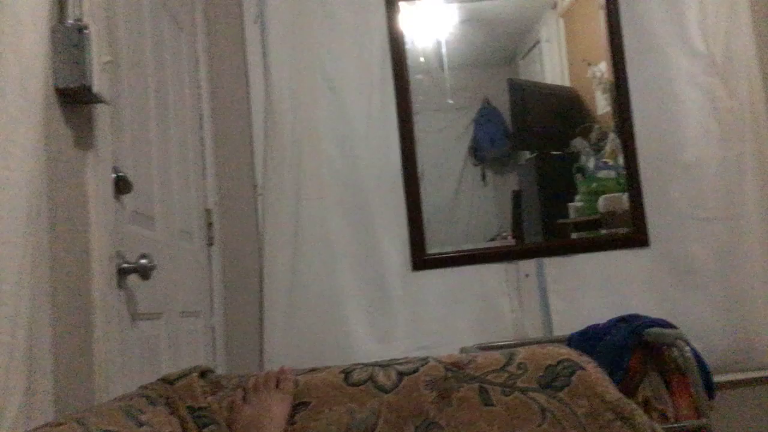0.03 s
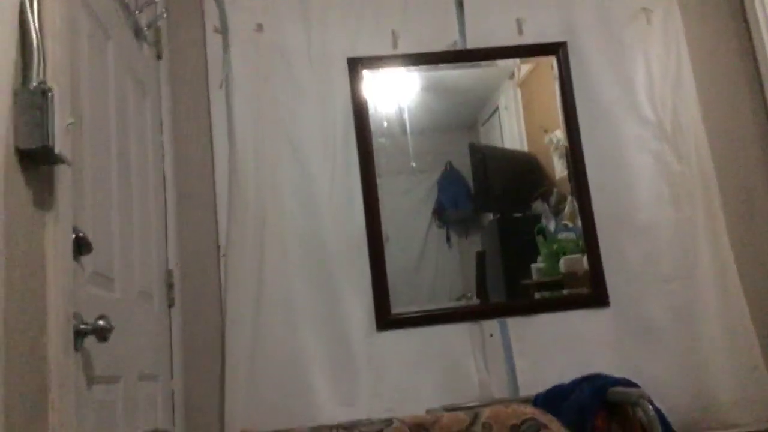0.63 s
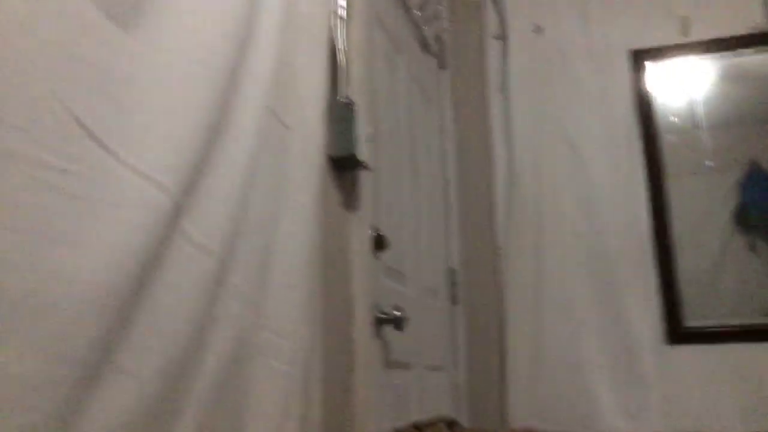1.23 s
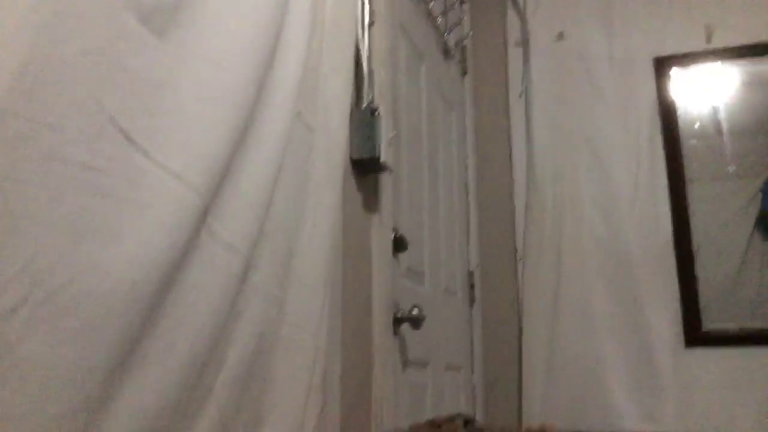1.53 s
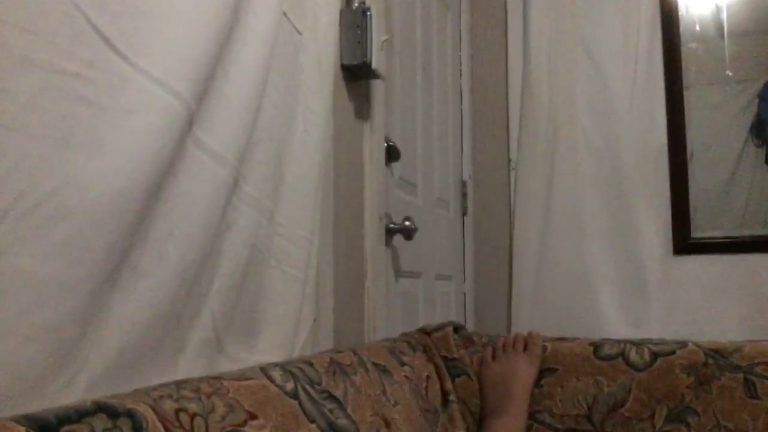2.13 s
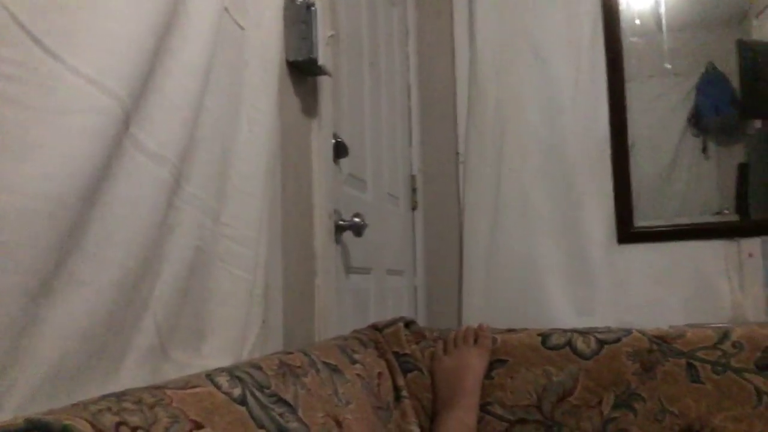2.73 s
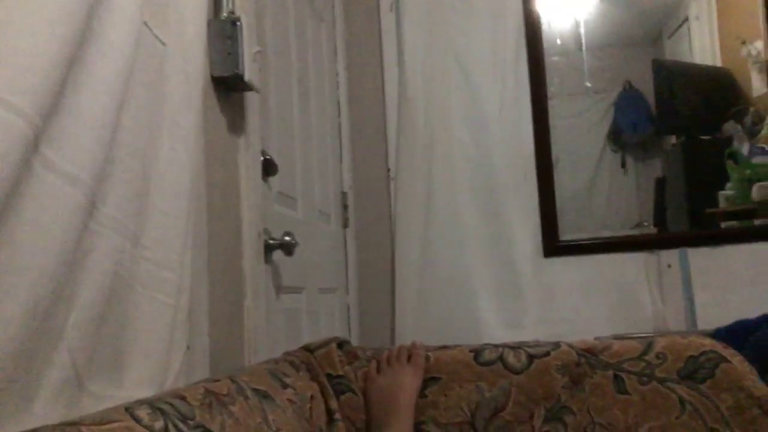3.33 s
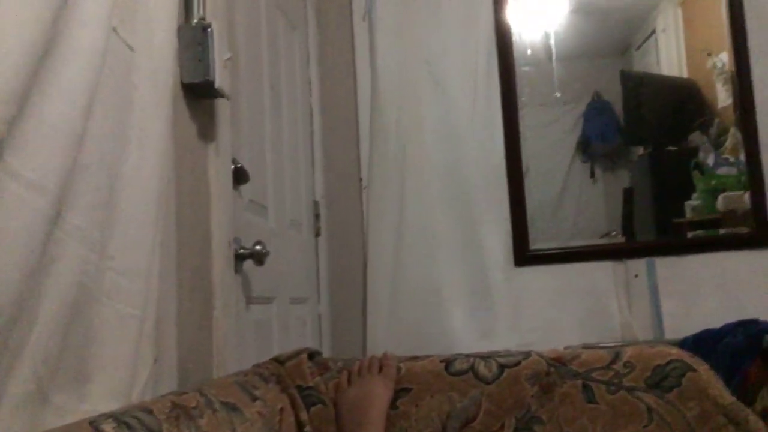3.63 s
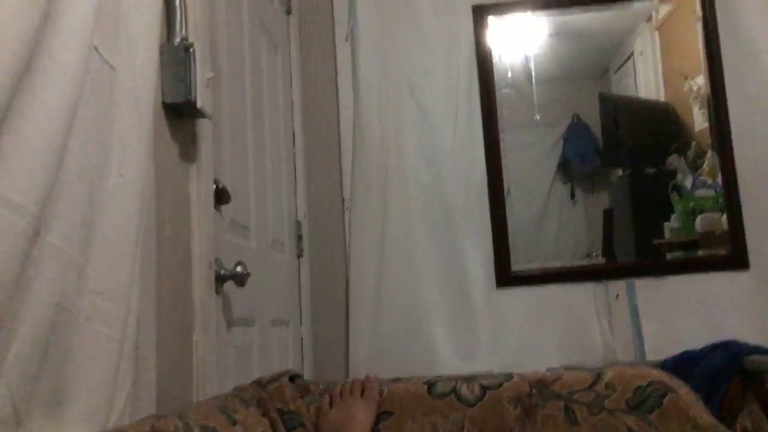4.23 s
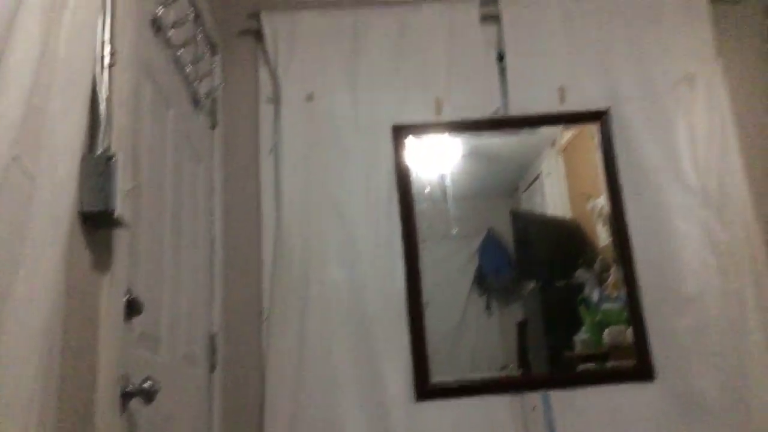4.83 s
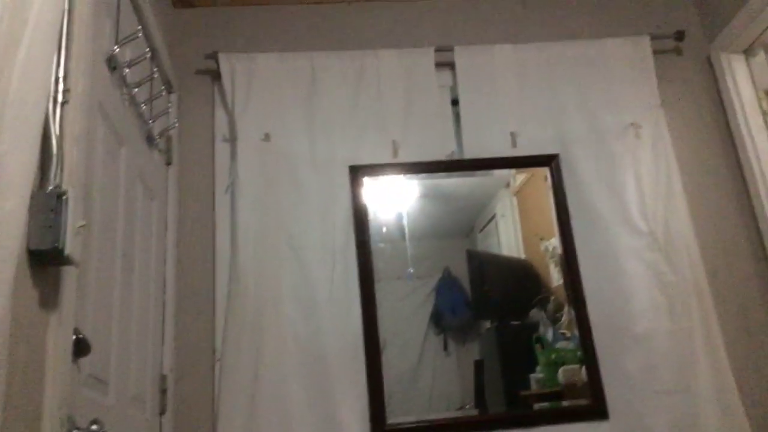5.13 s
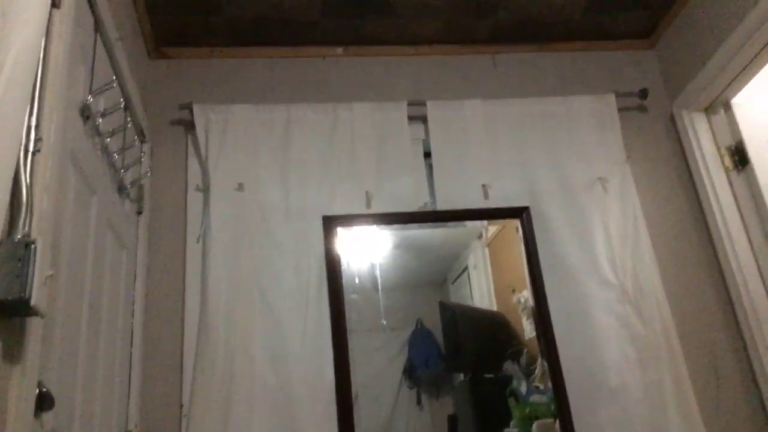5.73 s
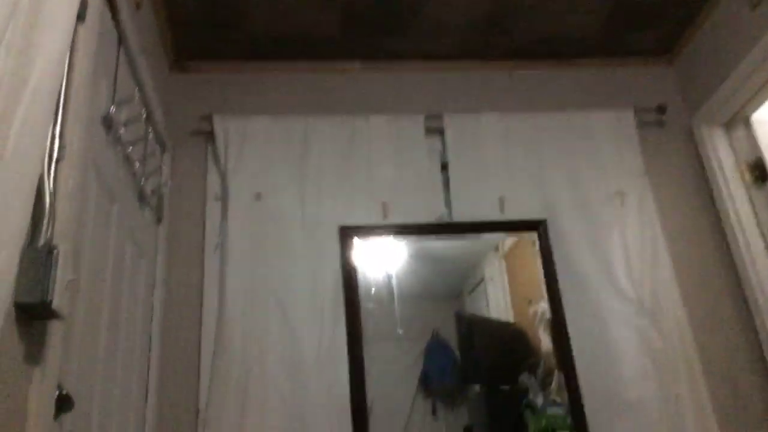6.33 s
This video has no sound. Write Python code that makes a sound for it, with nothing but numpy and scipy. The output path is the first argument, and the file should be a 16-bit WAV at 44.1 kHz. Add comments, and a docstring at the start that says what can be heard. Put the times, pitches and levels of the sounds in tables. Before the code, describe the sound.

Fingers knock and brush against a hand-held phone over the constant low rumble and soft hiss of a fan or air conditioner.

```python
"""Rushing air and a handled phone

A steady low rush of air, as from a fan or air conditioner, fills a small room while a hand-held
phone pans about. As the grip changes, fingertips bump the case with a tick and a thump, and skin
rubs and brushes over it. One finger hovers over the microphone port, muffling the hiss and
colouring it with a resonance that slides up as the finger moves away."""
import sys
import numpy as np
from scipy import signal
from scipy.fft import rfft, irfft
from scipy.io import wavfile
from scipy.ndimage import uniform_filter1d

SR = 44100
rng = np.random.default_rng(int(sys.argv[2]) if len(sys.argv) > 2 else 0)


def unload_wav(signal):
    """Save mono or channel-first audio to the path in sys.argv[1] as 16-bit WAV at rate SR, clipped to [-1, 1]."""
    wavfile.write(
        sys.argv[1],
        SR,
        np.round(np.clip(np.atleast_2d(signal).T, -1, 1) * 32767).astype(np.int16),
    )


N = 285327

# colour of the air's low rumble and of its hiss: (frequency [Hz], relative level [dB])
RUMBLE_COLOUR = [(22, -50), (45, -13.5), (72, -4.5), (108, 1), (145, -4.5), (180, -3), (240, -8),
                 (290, -16.5), (360, -19.5), (470, -28), (560, -25), (720, -27.5), (900, -42.5),
                 (2000, -91)]
HISS_COLOUR = [(200, 8), (900, -4), (1700, 3), (2800, -2.5), (3500, -6.5), (5000, -12), (6000, -17.5),
               (6600, -16.5), (7950, -22), (8100, -14.5), (9200, -17.5), (10500, -22.5), (13500, -22.5),
               (15700, -24.5)]
# fader moves on the air; the rumble dips briefly after the hardest bumps:
# (time [s], rumble gain [dB], hiss gain [dB])
AIR_FADERS = [(.55, 0.5, 2.5), (1.28, -1.7, 5), (1.38, -10.5, 2), (1.6, -1, 2.5), (1.85, -6.5, 1),
              (2.05, -6.5, 2.5), (2.2, -2.1, 1.74), (2.87, -1, 2.2), (3.6, -1.95, 3), (6.47, -3.5, 1.5)]

# finger over the port; the narrower the air gap, the lower it resonates:
# (time [s], resonance [Hz], peak height [dB], cover [0 clear, 1 over the port, more is tighter])
PORT_FINGER = [(.55, 9850, 12, 1), (.86, 11300, 7.5, 1), (1.0, 12300, 0.5, .27), (1.2, 8700, 10.5, 1.4),
               (1.35, 4800, -1.5, 0.89), (1.6, 4040, -2, 0.67), (1.73, 3250, -0.5, 0.046),
               (1.94, 3300, 0, 0), (1.99, 10200, 7.5, 0.32), (2.11, 8700, 9.5, 1.3), (2.25, 7100, 2, 1.2),
               (2.6, 5600, 2, 0.7), (2.92, 7300, 7, 1.1), (3.2, 5940, 3.5, 1.1), (3.28, 8450, 8.5, 1.45),
               (3.65, 8450, 8.5, 1.65), (3.8, 10700, 10, .96), (4.7, 10800, 7, 0.79),
               (5.15, 12500, 2.5, .11)]
# the echo off the hand cancels one band and lifts the band below; both move with the grip:
# (time [s], notch [Hz], depth [dB], lift [dB])
HAND_ECHO = [(.55, 3270, 6, 5), (1.1, 3040, 6, 2.5), (1.33, 3820, -4, 0.5), (1.85, 4230, 3, -2.5),
             (2.1, 3280, 5.5, 0.5), (2.6, 2940, 4, 1), (3.75, 3400, 3.5, .5), (4.8, 3500, 5, 1),
             (5.2, 4000, 4, 1), (5.8, 3800, 5.5, 2.5), (6.3, 3800, 4.5, 4.5)]
# scoop in the middle of the hiss that deepens as the phone tilts up: (time [s], depth [dB])
TILT_SCOOP = [(.55, 2), (3.9, 0.2), (5.3, 1.5), (6.0, 2), (6.3, 0.5)]

# fingertips hitting the case: (time [s], tick level [dB], tick cutoff [Hz], thump level [dB],
# thump pitch [Hz], lowest case resonance [Hz], hollowness [0 damped by the hand, 1 ringing])
FINGER_BUMPS = [(0.62, -47, 1200, -31, 130, 600, 0), (0.8073, -30.5, 3160, -28, 202, 640, 0.63),
                (1.1392, -17.5, 6200, -23.5, 166, 640, 0.86), (1.163, -39, 1100, -30.5, 280, 600, .3),
                (1.211, -60, 700, -39.5, 350, 600, 0), (1.26, -44, 1800, -44, 330, 600, 0.23),
                (1.3003, -20, 6200, -15.5, 239, 542, 0.66), (1.487, -46, 990, -39, 177, 600, 0.22),
                (1.587, -40, 1000, -39, 295, 600, 0.13), (1.631, -50, 1500, -31.5, 131, 600, 0),
                (1.6558, -51, 1500, -35.5, 290, 650, 0.88), (1.661, -31, 3200, -34, 195, 600, 0.35),
                (1.6784, -18, 5800, -13.5, 231, 617, 0.16), (1.9791, -33.5, 1380, -38, 316, 560, 0.071),
                (2.0939, -33.5, 4030, -40, 260, 600, .2), (2.2858, -40, 700, -32.5, 178, 610, 0.5),
                (2.294, -46, 700, -34, 182, 620, 0.11), (3.713, -74, 500, -39, 266, 600, 0),
                (4.313, -65, 500, -39.5, 194, 600, 0), (6.015, -47, 1200, -43, 217, 600, 0),
                (6.269, -72, 500, -40, 200, 600, 0)]
# colour of a fingertip's tick: (frequency [Hz], relative level [dB])
TICK_COLOUR = [(150, -49), (400, 10.5), (650, 15.5), (1100, 4), (2000, 1), (3000, 0), (4000, -10),
               (5200, -9), (7000, -25), (9000, -28), (15000, -38)]
# case resonances and one dead band: (frequency [multiple of the lowest], sharpness [Q], lift [dB])
CASE_MODES = [(1, 4.6, 4), (2.1, 3, 10), (3.03, 21, 12), (4.65, 9, 3.5), (5.75, 9.8, -19), (7.65, 10, 11.5)]

# skin sliding on the case:
# (time [s], length [s], grit level [dB], drag level [dB], fall over the stroke [dB], grit cutoff [Hz])
RUB_STROKES = [(0.608, 0.03, -54.5, -60, -1.5, 16000), (0.804, 0.025, -51, -58, 6, 16000),
               (0.819, 0.14, -59.5, -61.5, -6.5, 16000), (1.134, 0.037, -38.5, -37, 14, 14000),
               (1.162, 0.062, -61, -52, 1.5, 12000), (1.232, 0.075, -69, -62, 0, 11000),
               (1.3, 0.01, -38.5, -36, 2, 12000), (1.606, 0.0051, -44.5, -68, 14, 14000),
               (1.631, 0.0081, -52.5, -55, -6, 7550), (1.65, 0.017, -50, -43, -2, 8000),
               (1.666, 0.017, -53.5, -43, 4, 4500), (1.678, 0.03, -30, -42, 18.5, 10400),
               (1.692, 0.098, -49.5, -47.5, 21.5, 12000), (1.835, 0.0038, -49, -46.5, 5, 13000),
               (1.979, 0.05, -49.5, -49.5, 7.5, 14000), (2.091, 0.035, -46, -44, 4.5, 14000)]
# colour of a rub's bright grit and of its low dragging rustle: (frequency [Hz], relative level [dB])
GRIT_COLOUR = [(150, 9.5), (400, -15), (650, 4), (950, 0), (2200, 0), (3500, -6), (5300, -12.5),
               (7800, -18), (8600, -11), (10500, -17.5), (13000, -20), (15700, -31)]
DRAG_COLOUR = [(80, -29), (220, -0.5), (400, 0), (650, -1.5), (950, -29), (2000, -20), (6000, -73)]
# feather-light touches of skin: (time [s], length [s], level [dB], centre [Hz], width [octaves])
BRUSH_STROKES = [(0.616, 0.019, -69, 13000, .25), (0.855, 0.032, -66.5, 13000, 0.34),
                 (0.905, 0.047, -63, 4900, 0.14), (0.911, 0.04, -54.5, 2380, 0.18),
                 (1.167, 0.06, -69, 6150, 0.33), (1.227, 0.0054, -56, 8500, 0.42),
                 (1.335, 0.1, -72, 4460, 0.35), (1.693, 0.027, -61, 8850, 0.13),
                 (1.817, 0.042, -65, 3100, 0.14), (1.868, 0.13, -73.5, 3230, .13),
                 (1.855, 0.14, -79, 10000, 0.34), (2.82, 0.034, -72, 4300, 0.22),
                 (3.337, 0.039, -62, 1840, 0.19), (3.338, 0.03, -72.5, 4200, 0.23),
                 (3.684, 0.43, -72.5, 2400, 0.17), (4.352, 0.04, -67, 1960, .2),
                 (4.967, 0.07, -76, 3930, .16), (5.16, 0.15, -71, 2850, 0.15),
                 (5.754, 0.025, -64, 2190, 0.4), (5.882, 0.035, -77, 4300, .25),
                 (6.227, 0.15, -69, 2790, 0.11), (6.21, 0.12, -75, 12000, 0.84)]

LEAD_S = .002  # run-up to each pulse of a bump


def air(rumble_db=-45, hiss_db=-63):
    """Moving air fills the room with a low rumble and a softer hiss, both fluttering with turbulence."""
    rumble_fader_db, hiss_fader_db = follow(AIR_FADERS, np.arange(N) / SR)
    rumble = room_ripple(noise(RUMBLE_COLOUR), depth_db=1.0, bins=60)
    rumble = eddies(rumble, depth_db=1.14, samples=2000)
    hiss = room_ripple(noise(HISS_COLOUR), depth_db=0.68, bins=300)
    hiss = eddies(hiss, depth_db=1.3, samples=700)
    return gain_of(rumble_db + rumble_fader_db) * rumble + gain_of(hiss_db + hiss_fader_db) * hiss


def eddies(x, depth_db, samples, top_hz=5500):
    """Turbulence makes the level flutter; the hiss above top_hz stays smooth."""
    flutter = gain_of(depth_db * wander(N, samples))
    lows = irfft(rfft(x) / (1 + (np.fft.rfftfreq(N, 1 / SR) / top_hz) ** 4), N)
    return x + lows * (flutter - 1)


def room_ripple(x, depth_db, bins):
    """The room's echoes print a still pattern of fine peaks and dips on the air's spectrum."""
    spectrum = rfft(x)
    ripple = gain_of(depth_db * wander(len(spectrum), bins))
    return unit_rms(irfft(spectrum * ripple, N))


def shaded_port(x, muffle_db=12.5, shelf_octaves=0.86, lift_ratio=0.715, scoop_hz=1750):
    """The gap under the finger rings and shuts out treble; hand echo and tilt carve the mids."""
    hz, t, spectra = signal.stft(x, SR, nperseg=512, noverlap=384)
    hz = hz[:, None] + 1
    gap_hz, ring_db, cover = follow(PORT_FINGER, t)
    notch_hz, notch_db, lift_db = follow(HAND_ECHO, t)
    scoop_db, = follow(TILT_SCOOP, t)
    # the muffling shelf rides shelf_octaves above the gap's resonance
    shelf = .5 + .5 * np.tanh((np.log2(hz / gap_hz) - shelf_octaves) / 0.4)
    finger_db = ring_db * bell(hz, gap_hz, octaves=0.23) - cover * muffle_db * shelf
    ridge_db = lift_db * bell(hz, lift_ratio * notch_hz, octaves=0.16)
    hand_db = ridge_db - notch_db * bell(hz, notch_hz, octaves=0.35)
    tilt_db = -scoop_db * bell(hz, scoop_hz, octaves=0.35)
    shaded = spectra * gain_of(finger_db + hand_db + tilt_db)
    return signal.istft(shaded, SR, nperseg=512, noverlap=384)[1][:N]


def bumps(press_s=0.00052, thump_octaves=0.43, low_cut_hz=70, rock_hz=85, rock_db=-9):
    """A fingertip ticks and rings the case, then flattens into a damped thump and a slow rocking."""
    out, hz = np.zeros(N), np.fft.rfftfreq(2 ** 13, 1 / SR)
    low_cut = hz ** 2 / (hz ** 2 + low_cut_hz ** 2)
    rock = bell(hz, rock_hz, octaves=0.52)
    for start_s, tick_db, top_hz, thump_db, pitch_hz, case_hz, hollow in FINGER_BUMPS:
        tick = low_cut * gain_of(read_colour(TICK_COLOUR, hz)) * rolloff(hz, top_hz)
        tick = tick * case_ring(hz, case_hz, hollow)
        hump = 1 / (1 + (np.log2((hz + 1) / pitch_hz) / thump_octaves) ** 2)
        thump = low_cut * hump / (1 + (hz / (3 * pitch_hz)) ** 4)
        layers = (0, tick_db, tick), (press_s, thump_db, thump), (press_s, tick_db + rock_db, rock)
        for delay_s, level_db, colour in layers:
            add(out, start_s + delay_s - LEAD_S, gain_of(level_db) * bending_pulse(colour, hz))
    return out


def case_ring(hz, case_hz, hollow):
    """The case's short, hollow resonances and its dead band, which the grip retunes together."""
    response = 1
    for ratio, q, lift_db in CASE_MODES:
        mode_hz = ratio * case_hz
        detune = hz / mode_hz - mode_hz / (hz + 1)
        response = response * (1 + (gain_of(hollow * lift_db) - 1) / (1 + 1j * q * detune))
    return response


def bending_pulse(colour, hz, lag_cycles=0.98):
    """Bending waves deliver their lows late, so the pulse (peak 1) sweeps down from tick to thump."""
    phase_cycles = lag_cycles * np.log(hz + 1) + LEAD_S * hz
    pulse = irfft(colour * np.exp(-2j * np.pi * phase_cycles))
    pulse = pulse[:len(pulse) // 2]
    pulse *= np.minimum(np.arange(len(pulse)) / (LEAD_S * SR), 1) ** 2  # ease in over the run-up
    return pulse / abs(pulse).max()


def rubs():
    """Skin sticks and slips in short strokes: a gritty hiss over a low, dragging rustle."""
    out = np.zeros(N)
    grit = stick_slip(noise(GRIT_COLOUR), depth_db=1.5, samples=50)
    drag = noise(DRAG_COLOUR)
    for start_s, length_s, grit_db, drag_db, fall_db, top_hz in RUB_STROKES:
        span = slice(round(start_s * SR), round((start_s + length_s) * SR))
        n = len(grit[span])
        dulled_grit = irfft(rfft(grit[span]) * rolloff(np.fft.rfftfreq(n, 1 / SR), top_hz), n)
        stroke = gain_of(grit_db) * dulled_grit + gain_of(drag_db) * drag[span]
        envelope = gain_of(-fall_db * np.linspace(0, 1, n)) * signal.windows.tukey(n, .3)
        add(out, start_s, envelope * stroke)
    return out


def brushes():
    """Skin barely grazes the case: a soft, narrow, grainy hiss that swells and fades."""
    out = np.zeros(N)
    hiss = stick_slip(rng.standard_normal(N), depth_db=3.0, samples=130)
    for start_s, length_s, level_db, centre_hz, octaves in BRUSH_STROKES:
        stroke = hiss[round(start_s * SR):][:round(length_s * SR)]
        n = len(stroke)
        band = bell(np.fft.rfftfreq(n, 1 / SR), centre_hz, octaves)
        whisper = unit_rms(irfft(rfft(stroke) * band, n))
        add(out, start_s, gain_of(level_db) * signal.windows.tukey(n, .5) * whisper)
    return out


def stick_slip(x, depth_db, samples):
    """Skin catches and lets go, breaking a hiss into small grains."""
    grains = unit_rms(uniform_filter1d(rng.standard_normal(N), samples))
    return unit_rms(x * gain_of(depth_db * grains))


def noise(colour):
    """Coloured noise at rms 1."""
    gain = gain_of(read_colour(colour, np.fft.rfftfreq(N, 1 / SR)))
    return unit_rms(irfft(rfft(rng.standard_normal(N)) * gain, N))


def wander(n, width):
    """A random curve at rms 1, smoothed twice over width points."""
    return unit_rms(uniform_filter1d(uniform_filter1d(rng.standard_normal(n), width), width))


def bell(hz, centre_hz, octaves):
    """A smooth hump of height 1 on a log-frequency axis."""
    return np.exp(-.5 * (np.log2((hz + 1) / centre_hz) / octaves) ** 2)


def rolloff(hz, top_hz):
    """A low-pass curve, falling 24 dB per octave above top_hz."""
    return 1 / np.hypot(1, (hz / top_hz) ** 4)


def read_colour(colour, hz):
    """A colour table's level in dB, joined up on a log-frequency axis."""
    points_hz, level_db = np.transpose(colour)
    return np.interp(np.log(hz + 1), np.log(points_hz + 1), level_db)


def follow(rows, t):
    """The lanes of an automation table at the times t."""
    times, *lanes = np.transpose(rows)
    return [np.interp(t, times, lane) for lane in lanes]


def add(mix, start_s, sound):
    """Drops a sound into the mix at start_s."""
    part = mix[round(start_s * SR):][:len(sound)]
    part += sound[:len(part)]


def gain_of(db):
    """Decibels to linear gain."""
    return 10 ** (np.asarray(db) / 20)


def unit_rms(x):
    """Scales to rms 1."""
    return x / np.sqrt(np.mean(x ** 2) + 1e-20)


def scene():
    """Air and rubs come in through the shaded port; bumps and brushes on the case bypass it."""
    return (shaded_port(air() + rubs()) + bumps() + brushes())[None]


def record(dry, open_s=0.5365, fade_s=0.039, low_cut_hz=36, high_cut_hz=15740):
    """The microphone opens after a moment of silence and trims the deepest bass and the very top."""
    fade_in = np.clip((np.arange(N) / SR - open_s) / fade_s, 0, 1)
    low_cut = signal.butter(4, low_cut_hz, "high", fs=SR, output="sos")
    high_cut = signal.firwin(511, high_cut_hz, window=("kaiser", 9), fs=SR)
    return signal.oaconvolve(signal.sosfilt(low_cut, dry * fade_in), high_cut[None], "same")


dry = scene()
out = record(dry)
unload_wav(out)
```